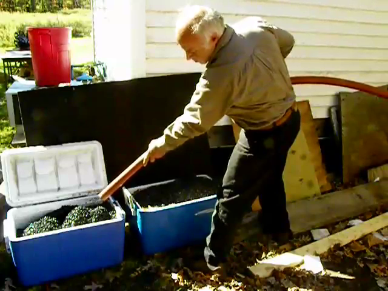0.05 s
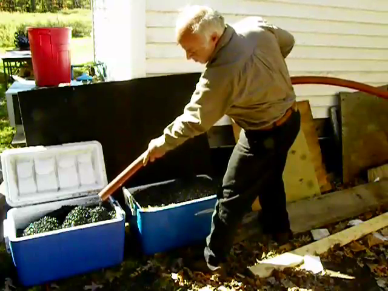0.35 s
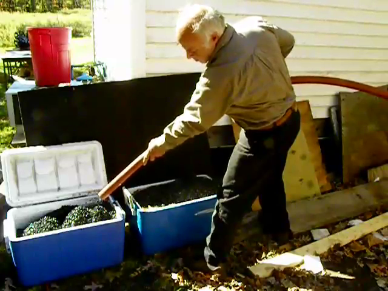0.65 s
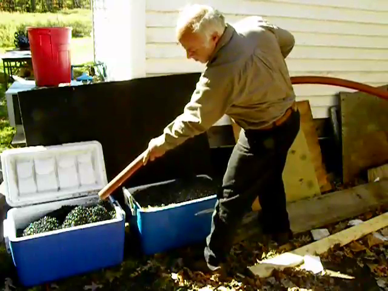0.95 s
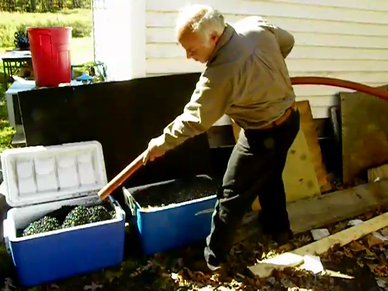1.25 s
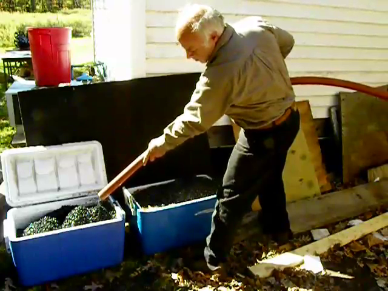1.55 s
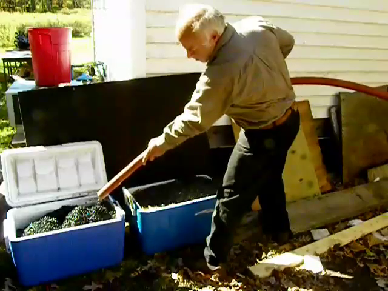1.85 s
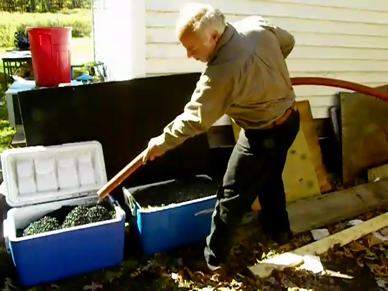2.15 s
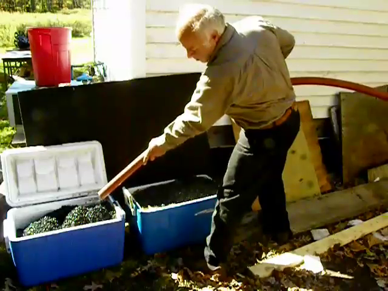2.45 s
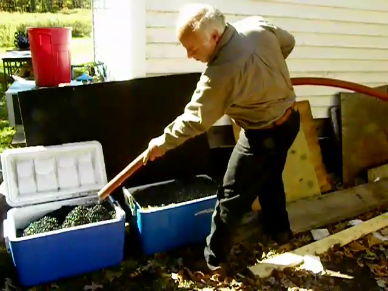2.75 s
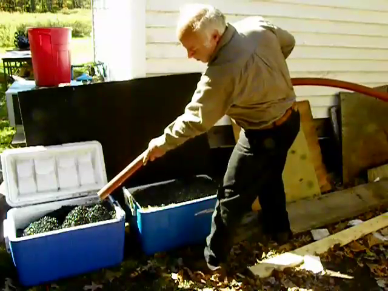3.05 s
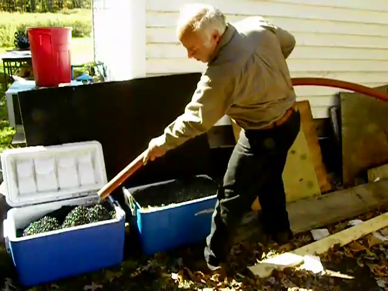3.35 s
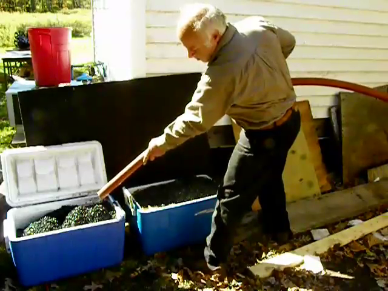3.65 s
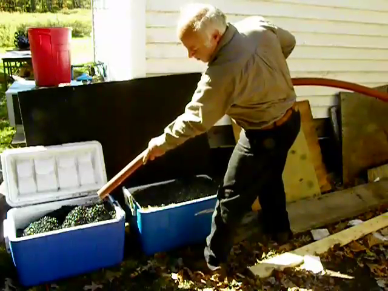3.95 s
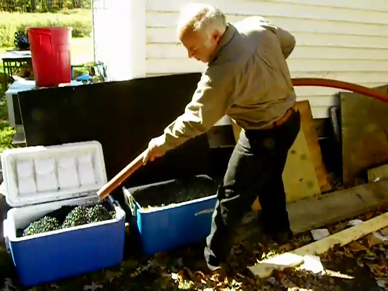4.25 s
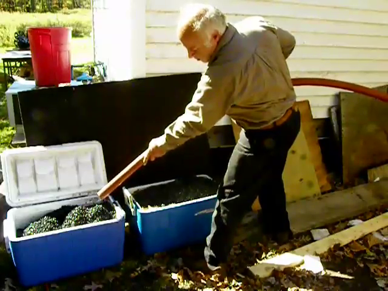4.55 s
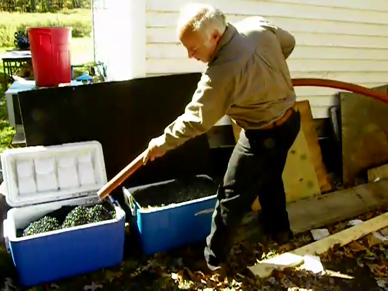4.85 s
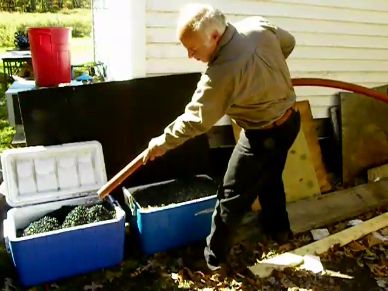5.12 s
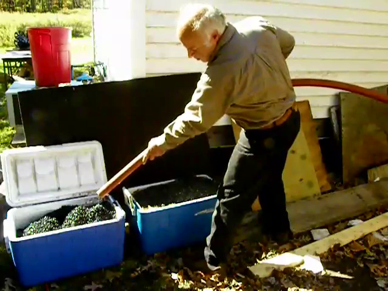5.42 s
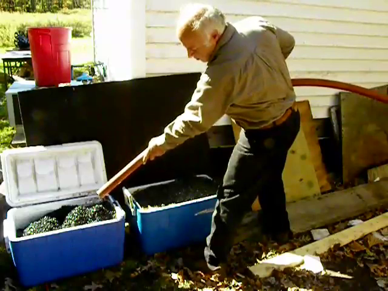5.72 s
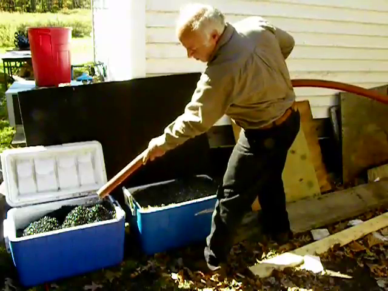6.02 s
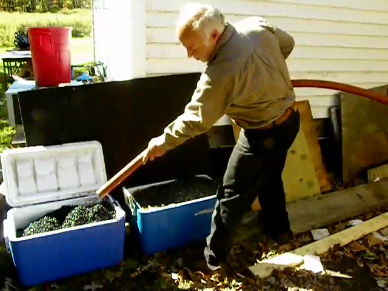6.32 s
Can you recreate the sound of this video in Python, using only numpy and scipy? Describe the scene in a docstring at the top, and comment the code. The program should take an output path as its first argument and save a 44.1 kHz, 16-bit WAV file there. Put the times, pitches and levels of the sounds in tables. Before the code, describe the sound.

From the first moment to the end, about six and a half seconds later, small coal pours from an auger hose onto a heap inside a plastic cooler. It comes in even surges, about six a second, each a bright, hissing rattle of countless tiny impacts lasting roughly a tenth of a second. Between surges the heap keeps sliding with a quieter, duller rustle. The pace and loudness hardly change. Larger pieces give brief, high chinks here and there, most clearly around 0.6, 1.8, 3.3 to 3.4 and 5.7 seconds. The cooler adds a slight boxy resonance and very short reflections. Underneath, a light outdoor breeze rumbles faintly on the single microphone, with small puffs near 1.6 and 5.9 seconds. One soft, low bump sounds at about 4.8 seconds while the coal keeps pouring.

```python
"""Outdoors, at a plastic cooler, a flexible auger turns in a hose and pours small coal onto a heap.
Each turn of the screw displaces one surge of grains, about six a second. Their many brief impacts
sum to a rattle, and the heap goes on sliding in between. A few larger pieces chink, and the box adds
its resonances and short echoes. A light breeze buffets the single microphone; one soft bump sounds."""
import sys
import numpy as np
from scipy import signal
from scipy.fft import rfft, irfft
from scipy.io import wavfile
from scipy.ndimage import uniform_filter1d

SR = 44100
rng = np.random.default_rng(int(sys.argv[2]) if len(sys.argv) > 2 else 0)


def waveform_to_disk(signal):
    """Save audio, clipped to [-1, 1], as 16-bit WAV at the path in sys.argv[1]."""
    frames = np.transpose(np.atleast_2d(signal))
    scaled = np.clip(frames, -1, 1) * 32767
    samples = np.round(scaled).astype(np.int16)
    wavfile.write(sys.argv[1], SR, samples)


N = 281358
TIME = np.arange(N) / SR
HZ = np.fft.rfftfreq(N, 1 / SR)


def amp(db):
    """Amplitude ratio of a level in decibels."""
    return 10 ** (np.asarray(db) / 20)


def unit(x):
    """Normalisation to rms 1."""
    return x / np.sqrt(np.mean(x ** 2) + 1e-20)


def add(mix, start_s, sound):
    """Superposition: a sound joins the mix at its start time."""
    part = mix[max(round(start_s * SR), 0):][:len(sound)]
    part += sound[:len(part)]


def colour(x, points):
    """Minimum-phase filtering by (Hz, dB) points: it is causal, so clicks keep their sharp front."""
    hz, db = np.transpose(points)
    log_gain = np.log(amp(np.interp(np.log(HZ + 1), np.log(hz), db)))
    causal_window = 1 + np.sign(N / 2 - np.arange(N)) - (TIME == 0)
    cepstrum = irfft(log_gain, N) * causal_window
    return irfft(rfft(x) * np.exp(rfft(cepstrum)), N)


def wander(rate_hz):
    """Low-pass noise: a random drift of rms 1, mostly slower than the rate."""
    return unit(irfft(rfft(rng.standard_normal(N)) / (1 + (HZ / rate_hz) ** 4), N))


# Spectrum of the breeze and outdoor rumble: (frequency [Hz], relative level [dB])
BREEZE_SPECTRUM = [(15, -19), (30, -7), (55, -3.5), (80, -3), (110, -2.5), (170, -12.5), (260, -19),
                   (600, -25), (3000, -60)]

def breeze(level_db=-64.0, swell_db=2.5):
    """Turbulence: slow pressure fluctuations in moving air make a low, uneven rumble."""
    rumble = colour(rng.standard_normal(N), BREEZE_SPECTRUM)
    return amp(level_db) * unit(rumble * amp(swell_db * wander(2.2)))


# Gusts on the microphone: (time [s], level [dB], Gaussian half width [s])
GUST_EVENTS = [(1.5, -53, .07), (1.63, -47, 0.03), (2.19, -52, .025), (2.622, -59, 0.071),
               (3.27, -52, 0.028), (3.526, -59, .03), (5.057, -54, 0.074), (5.792, -55, 0.064),
               (5.925, -49, 0.036), (6.255, -54.5, 0.14)]
# Spectrum of a gust: (frequency [Hz], relative level [dB])
GUST_SPECTRUM = [(15, -20), (35, -9), (70, -0.5), (120, -2.5), (160, -14.5), (230, -19), (600, -57),
                 (3000, -80)]

def gusts():
    """Wind noise: passing eddies press on the microphone in short, low swells."""
    envelope = sum(amp(db) * np.exp(-((TIME - s) / width) ** 2 / 2) for s, db, width in GUST_EVENTS)
    return envelope * unit(colour(rng.standard_normal(N), GUST_SPECTRUM))


def thud(start_s=4.828, level_db=-37.0, hz=105, swell_s=0.0046):
    """A damped oscillation with a gradual onset, heard as one soft, low bump."""
    t = np.maximum(TIME - start_s, 0)
    envelope = (t / swell_s / 2) ** 2 * np.exp(2 - t / swell_s)
    return amp(level_db) * envelope * np.sin(2 * np.pi * hz * t)


# Air modes of the cooler and the hose mouth: (frequency [Hz], bandwidth [Hz], boost [dB])
CAVITY_MODES = [(416, 41, 0.5), (643, 180, 2), (1063, 85, 2.5), (2140, 36, 1.5), (3080, 83, 2.5)]

def cooler(x, echo_db=-17, decay_s=0.0042, echo_count=40):
    """Cavity resonance colours the rattle; the lid and the wall behind return early reflections."""
    boost_db = sum(db / (1 + (2 * (HZ - hz) / width) ** 2) for hz, width, db in CAVITY_MODES)
    delay_s = rng.uniform(.002, .035, echo_count)
    taps = np.zeros(N)
    taps[(delay_s * SR).astype(int)] = rng.choice([-1, 1], echo_count) * np.exp(-delay_s / decay_s)
    echoes = signal.fftconvolve(x, np.trim_zeros(taps, "b") / np.linalg.norm(taps))[:N]
    return irfft(rfft(x + amp(echo_db) * echoes) * amp(boost_db), N)


def landing_spot(x, depth_db=0.8, patch_bins=9, patch_frames=24):
    """Spectral modulation: the landing spot wanders, so each surge has a slightly different colour."""
    spectrogram = signal.stft(x, nperseg=512, noverlap=384)[2]
    patches = uniform_filter1d(rng.standard_normal(spectrogram.shape), patch_bins, axis=0)
    patches = unit(uniform_filter1d(patches, patch_frames, axis=1))
    return signal.istft(spectrogram * amp(depth_db * patches), nperseg=512, noverlap=384)[1][:N]


# Spectrum of the sliding heap's duller rustle: (frequency [Hz], relative level [dB])
SLIDE_SPECTRUM = [(60, -36), (220, -21.5), (400, -8), (650, -4), (1300, -0.5), (3500, -2), (4400, 1.5),
                  (6500, 1), (9000, -5.5), (15500, -28)]

def slide(flow_db, level_db=-31, follow=0.43, grit_db=2.0):
    """Friction noise: settling coal rubs and rolls down the heap, following the surges only loosely."""
    grit = rng.standard_normal(N) * amp(grit_db * wander(1300))
    return amp(level_db) * unit(colour(grit * amp(follow * flow_db), SLIDE_SPECTRUM))


def impact(centre_hz, decay_s, octaves):
    """Impact transient of one piece of coal: a heavily damped noise burst around its own pitch."""
    t = TIME[:1024]
    crack = rng.standard_normal(len(t)) * np.exp(-t / decay_s)
    edges_hz = np.clip(centre_hz * 2 ** (np.array([-.5, .5]) * octaves), 20, SR / 2 - 20)
    return signal.sosfilt(signal.butter(1, edges_hz, "band", fs=SR, output="sos"), crack)


# Collisions of larger pieces: (time [s], relative peak level [dB], centre frequency [Hz])
CHINK_EVENTS = [(0.2867, -11, 6750), (0.621, -7, 8750), (0.9258, -9, 6700), (1.772, -4.5, 6110),
                (2.8138, -8, 6450), (3.3278, -4, 6200), (3.4145, -7.5, 6420), (3.4324, -6, 7000),
                (4.5027, -10, 7000), (5.02, -11, 6470), (5.0376, -9, 6450), (5.7034, -6.5, 6370),
                (5.8706, -8.5, 7220)]

def chinks(gain_db=-0.5, attack_s=0.00084):
    """Damped ringing: larger pieces strike each other and sound briefly in a narrow, bright band."""
    out = np.zeros(N)
    for start_s, db, hz in CHINK_EVENTS:
        crack = impact(hz, decay_s=0.0023, octaves=0.54)
        crack *= 1 - np.exp(-TIME[:len(crack)] / attack_s)
        add(out, start_s, amp(db + gain_db) * crack / abs(crack).max())
    return out


def surge(start_s, length_s, strength_db, attack_s, release_s=0.0068, arch_db=5.0, crest_at=0.48,
          trickle_db=-17.5, trickle_s=0.09):
    """Power envelope of one turn's load: it breaks from the hose, arches, runs dry and trickles."""
    t = TIME - start_s
    opened = (1 + np.tanh(t / attack_s / 2)) / 2
    emptied = (1 + np.tanh((t - length_s) / release_s / 2)) / 2
    progress = np.clip(t / length_s, 0, 1)
    arch = amp(-arch_db * (2 * (progress - crest_at)) ** 2)
    trickle = amp(trickle_db) * np.exp(-np.maximum(t - length_s, 0) / trickle_s / 2)
    # Each turn carries about the same load, so a longer surge is thinner: 1 dB per doubling.
    thinning_db = np.log2(length_s / 0.097)
    crest = amp(-18.5 + strength_db - thinning_db)
    return crest ** 2 * opened * ((1 - emptied) * arch ** 2 + emptied * trickle ** 2)


# One surge for each turn of the screw: (start [s], length [s], relative level [dB], attack [s])
AUGER_TURNS = [(-0.049, 0.12, 0.2, 0.0058), (0.114, 0.102, 0.15, 0.0039), (0.275, 0.12, -0.2, 0.0037),
               (0.441, 0.086, 0.75, 0.0035), (0.622, 0.11, 1.0, 0.0073), (0.816, 0.088, -0.6, 0.007),
               (0.92, 0.13, 0.1, 0.0047), (1.121, 0.11, 0.96, 0.0094), (1.282, 0.12, -0.0, 0.0058),
               (1.446, 0.1, 0.94, 0.031), (1.603, 0.097, 0.3, 0.0046), (1.754, 0.1, 1.54, 0.0077),
               (1.935, 0.098, 0.5, 0.0079), (2.089, 0.1, 0.3, 0.016), (2.239, 0.11, 0.2, 0.0049),
               (2.409, 0.12, 0.1, 0.0097), (2.574, 0.127, 0.5, 0.023), (2.744, 0.1, -0.2, 0.0051),
               (2.902, 0.099, -0.5, 0.0051), (3.049, 0.12, 0, 0.0054), (3.23, 0.12, -0.04, 0.0069),
               (3.403, 0.098, -1.5, 0.0015), (3.57, 0.091, -1.2, 0.0065), (3.72, 0.1, 0.3, 0.0059),
               (3.875, 0.096, -0.2, 0.0047), (4.06, 0.095, 0.5, 0.014), (4.214, 0.14, -1.1, 0.0032),
               (4.362, 0.123, 0, 0.0084), (4.503, 0.14, -0.5, 0.002), (4.699, 0.099, -0.1, 0.0051),
               (4.866, 0.096, 0.5, 0.0093), (5.017, 0.133, -0.8, 0.0035), (5.177, 0.13, 0.3, 0.0042),
               (5.357, 0.11, 0.55, 0.0042), (5.516, 0.097, -0.0, 0.0043), (5.677, 0.14, 0.3, 0.0105),
               (5.865, 0.14, -1.3, 0.0021), (6.02, 0.1, 0, 0.0053), (6.176, 0.12, 0.1, 0.012),
               (6.337, 0.068, -0.4, 0.0043)]

def auger_flow(dribble_db=-38, lumps_db=0.21, lumps_hz=20):
    """Incoherent addition: lumpy surges and a steady dribble sum in power to a flow level in dB."""
    power = amp(dribble_db) ** 2 + sum(surge(*turn) for turn in AUGER_TURNS)
    return 10 * np.log10(power) + lumps_db * wander(lumps_hz)


# Spectrum of grains striking the heap: (frequency [Hz], relative level [dB])
STRIKE_SPECTRUM = [(60, -55), (200, -31), (400, -17), (630, -11), (1100, -8), (1900, -4.5), (2800, -7),
                   (3750, -6.5), (4250, -2), (6200, 0.83), (8900, 0.3), (10800, -6), (11900, -6.5),
                   (15500, -16)]

def pour(flow_db, base_hits_per_s=12500, spread_db=2.5, clump_db=0.77, contrast=1.12, crowding=.4,
         gain_db=-0.13, size_count=30):
    """Shot noise: grains of many sizes hit the heap; a fuller flow brings more and harder blows."""
    strength_db = contrast * (flow_db - flow_db.mean()) + clump_db * wander(160)
    density = amp(2 * crowding * strength_db)  # crowding: the share of a rise due to more hits
    hits = rng.random(N) < base_hits_per_s * density / SR
    scatter_db = spread_db * np.minimum(rng.exponential(1, N), 4)
    blows = hits * amp(scatter_db + (1 - crowding) * strength_db)
    sizes = rng.integers(0, size_count, N)
    grains = np.zeros(N)
    for size, centre_hz in enumerate(np.geomspace(900, 14000, size_count)):
        crack = unit(impact(centre_hz, decay_s=0.00054, octaves=2.85)) * np.sqrt(centre_hz)
        grains += signal.oaconvolve(blows * (sizes == size), crack)[:N]
    # Whiten the mix of sizes, so that the heap alone sets the overall colour.
    spectrum = rfft(grains)
    smoothed_power = uniform_filter1d(abs(spectrum) ** 2, size=500)
    grains = irfft(spectrum / np.sqrt(smoothed_power + 1e-12), N)
    flow_rms = np.sqrt(np.mean(amp(2 * flow_db)))
    return amp(gain_db) * flow_rms * unit(colour(grains, STRIKE_SPECTRUM))


def scene():
    """Superposition of coal, wind and bump at one microphone, the same in both channels."""
    flow_db = auger_flow()
    coal = landing_spot(pour(flow_db) + slide(flow_db)) + chinks()
    mono = cooler(coal) + breeze() + gusts() + thud()
    return np.array([mono, mono])


def record(dry, notch_hz=7870, notch_width_hz=950, leak_db=-26, cutoff_hz=15900):
    """Band-stop and low-pass filtering: a deep notch in the treble and a steep upper band edge."""
    b, a = signal.iirnotch(notch_hz, notch_hz / notch_width_hz, fs=SR)
    notched = signal.lfilter(b, a, dry) + amp(leak_db) * dry
    lowpass = signal.firwin(511, cutoff_hz, window=("kaiser", 9), fs=SR)
    return signal.oaconvolve(notched, lowpass[None], "same")


dry = scene()
out = record(dry)
waveform_to_disk(out)
```